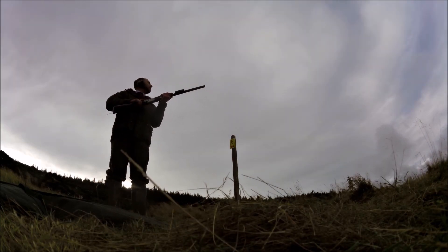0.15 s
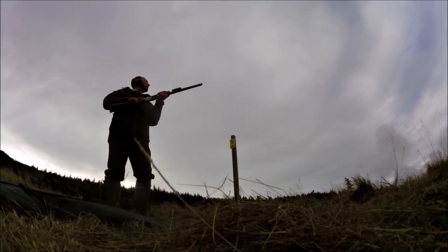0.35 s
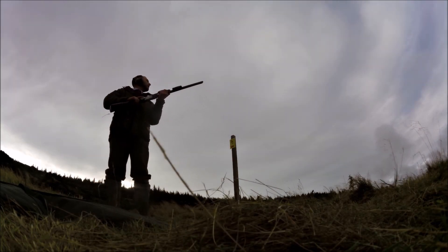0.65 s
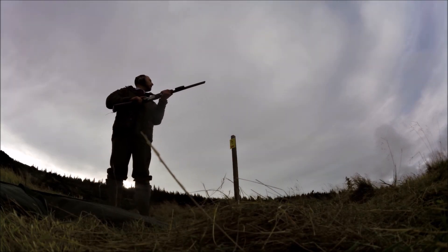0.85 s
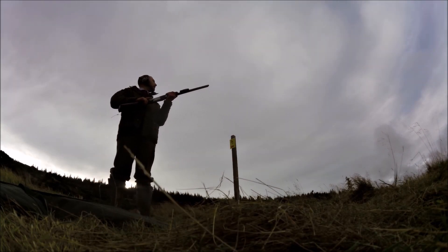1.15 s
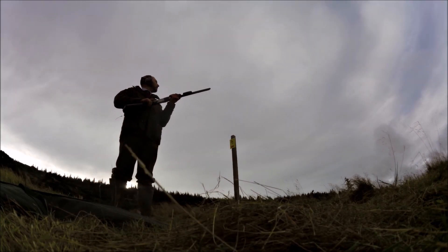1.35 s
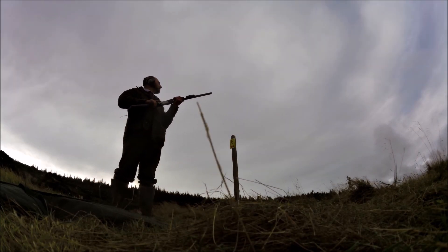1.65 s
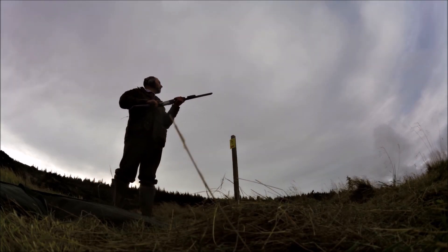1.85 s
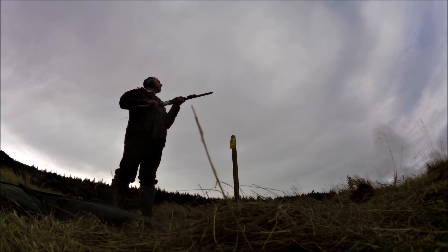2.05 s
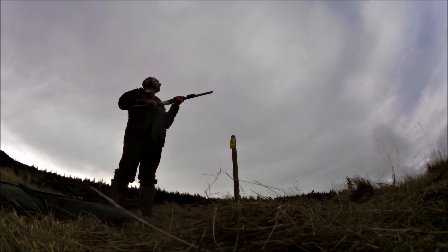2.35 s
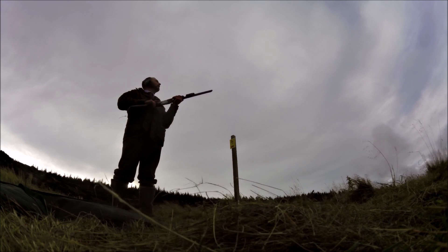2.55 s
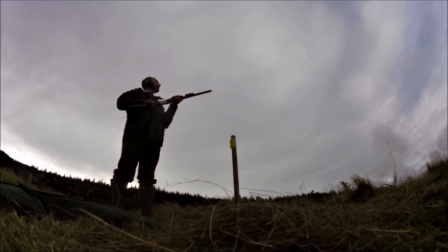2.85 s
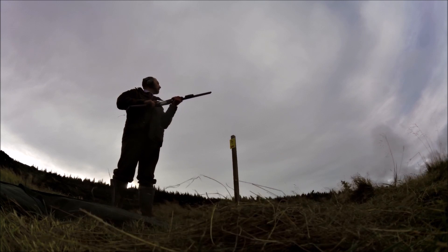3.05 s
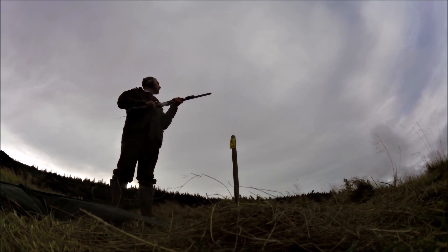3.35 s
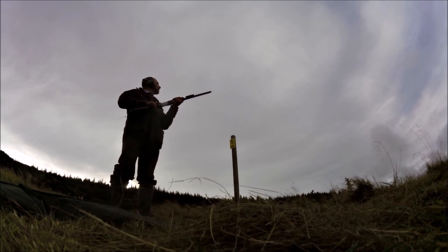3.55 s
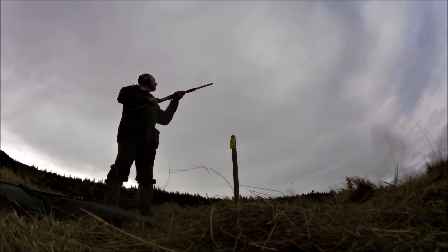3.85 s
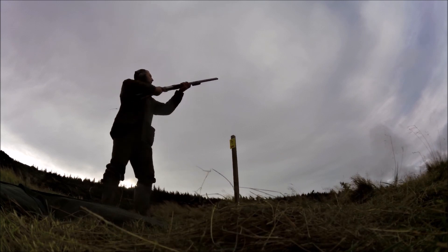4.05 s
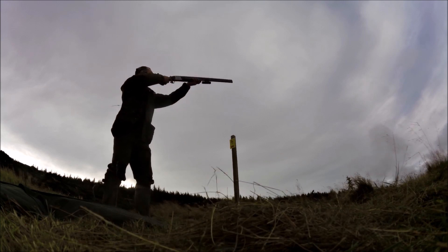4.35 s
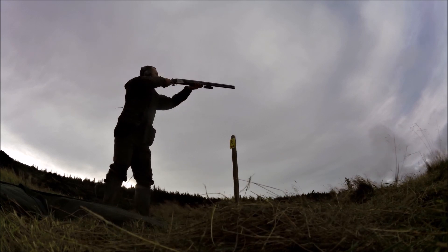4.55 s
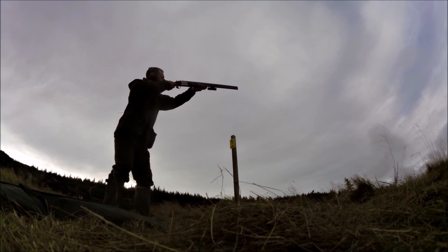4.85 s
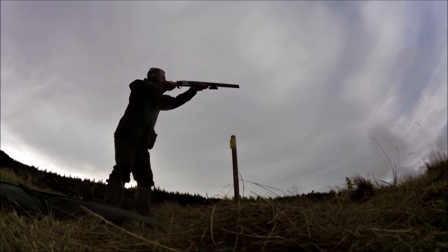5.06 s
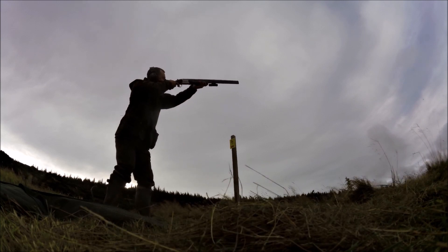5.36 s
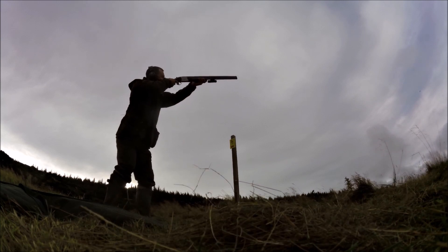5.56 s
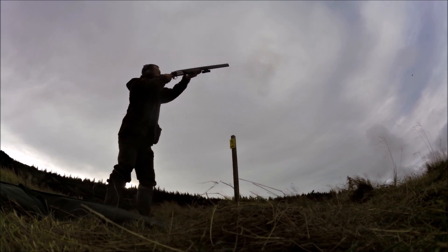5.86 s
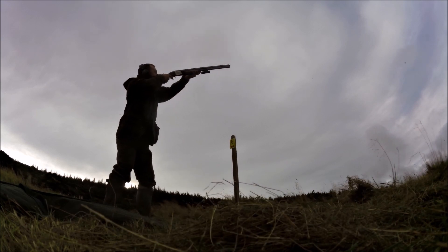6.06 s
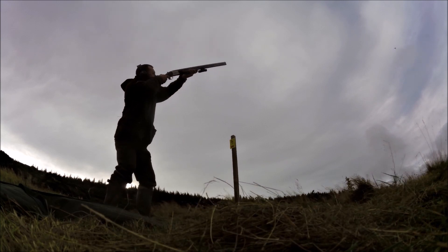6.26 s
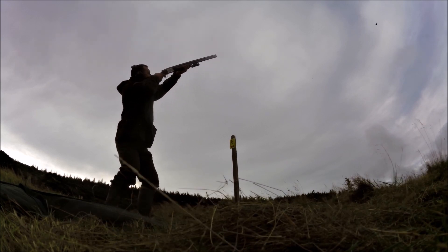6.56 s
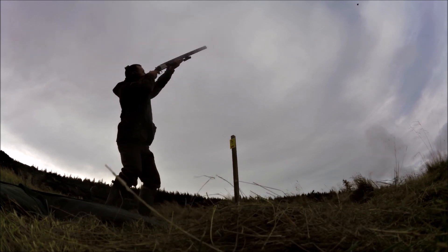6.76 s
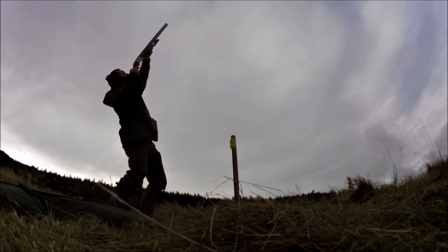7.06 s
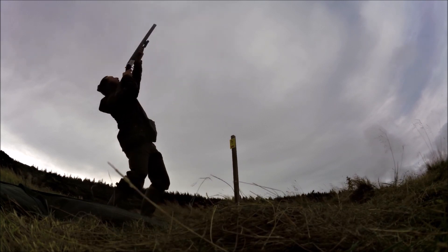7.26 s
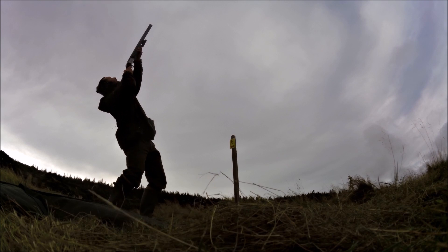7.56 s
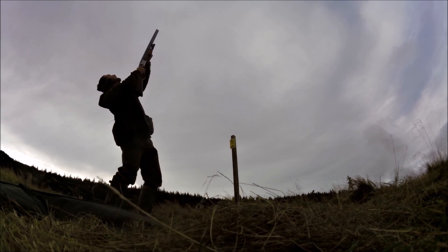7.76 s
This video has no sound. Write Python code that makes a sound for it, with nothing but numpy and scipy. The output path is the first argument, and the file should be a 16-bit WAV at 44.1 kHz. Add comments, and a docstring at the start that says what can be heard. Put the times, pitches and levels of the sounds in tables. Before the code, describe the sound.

On an open hillside, light wind bumps softly against a microphone low in the grass. Shotguns then start firing at a distance, an uneven string of pops and thuds, each followed by a short echo rolling off the slopes. Late on, a much closer gun fires two loud, sharp blasts about a second apart, while the distant guns keep going. Faint open air hiss lies underneath.

```python
"""Shotguns on an open hillside

A line of guns fires, heard by a small camera lying low in the grass. Each blast comes as two pressure
fronts, a bank bounce and a slow ground wave, scatters off the turf and rolls back from the slopes.
The nearest gun overloads the microphone; between shots light wind bumps against it."""
import sys
import numpy as np
from scipy import signal
from scipy.fft import rfft, irfft, next_fast_len
from scipy.io import wavfile

SR = 44100
rng = np.random.default_rng(int(sys.argv[2]) if len(sys.argv) > 2 else 0)


def to_wav(sig):
    """Store sig (one row per channel, or 1-D mono) as 16-bit WAV at the path in sys.argv[1].

    Samples outside -1..1 are clipped; the rate is SR.
    """
    pcm = np.clip(np.atleast_2d(sig), -1, 1) * 32767
    pcm = np.round(pcm).astype(np.int16)
    wavfile.write(sys.argv[1], SR, pcm.T)  # frames by channels


N = 348831
TIME = np.arange(N) / SR
CONTROL_TIME = TIME[::44]

# Camera case resonances: pitch_hz, width_hz, gain_db
CASE_MODES = [(455, 296, -0.5), (2260, 180, -10.5), (4240, 570, -10)]
# Gunshots: start_s, first_front_db, second_front_db, second_lag_ms, overpressure_ms, air_cutoff_hz,
# hollow_hz, hollow_db, bank_db, bank_lag_ms, wave_db, wave_lag_ms, wave_hz, tail_db
GUNSHOTS = [ (1.981, 0.5, 11, 1.93, 0.73, 1280, 1420, 11, -3, 14.4, -9.5, 7.2, 204, -36.5),
            (2.958, -3, 9.5, 1.9, 0.85, 1750, 2580, 9.5, -10.5, 14.6, -19.6, 10.8, 109, -41.5),
            (3.1896, -3.5, 4.5, 1.81, .42, 3500, 1770, 8, -13.5, 13.8, -20, 6.9, 135, -43.5),
            (4.2359, -2.5, 5, 1.97, 0.44, 2700, 2030, 7, -16, 15.5, -20, 7.3, 134, -48.5),
            (4.4563, 1, 1.5, 3.33, 1.36, 644, 2210, 14.5, -16, 15.1, -26, 12.5, 131, -44.5),
            (5.0452, -5.5, 5, 1.97, 1.2, 1510, 294, 6.5, -20, 8.3, -28, 12, 80, -49),
            (5.7233, -5.5, 1.1, 1.6, 0.31, 1550, 2650, 10.5, -18, 14, -24.5, 9.6, 119, -44.5),
            (5.908, -3.5, -4.5, 1.59, 0.9, 1690, 2170, 4, -24, 15, -33, 10.5, 105, -51),
            (5.933, 8, 25.5, 1.51, 0.39, 4100, 2500, 7, 18, 6.36, -1.5, 6.3, 140, -22.5),
            (6.1568, -3.5, 7, 0.89, 0.87, 1380, 2080, 9, -3, 4.4, -14, 6.76, 160, -52),
            (7.059, 11.5, 27, 1.14, 0.38, 3420, 2280, 4, 15, 7.9, -0.5, 5.28, 226, -25.5),
            (7.4062, -8.5, 2.5, 1.31, 0.47, 1880, 1850, 8, -28, 17, -18, 6.2, 154, -43.5)]


def blasts(direct_gain=0.13, bounce_cutoff_hz=1500, wave_width_cycles=0.66):
    """Three paths per shot, dulled by distance and coloured by the case, plus a low ground wave."""
    out = np.zeros(N)
    t_ms = TIME[:2048] * 1000
    for (start_s, first_db, second_db, second_lag_ms, overpressure_ms, air_cutoff_hz,
         hollow_hz, hollow_db, bank_db, bank_lag_ms, wave_db, wave_lag_ms, wave_hz, _) in GUNSHOTS:
        first = from_db(first_db) * pressure_front(t_ms, overpressure_ms)
        second = from_db(second_db) * pressure_front(t_ms - second_lag_ms, overpressure_ms)
        bank = from_db(bank_db) * pressure_front(t_ms - bank_lag_ms, overpressure_ms)
        pressure = cut(first + cut(second + bank, bounce_cutoff_hz, order=1), air_cutoff_hz)
        # the lie of the ground favours one band
        pressure += from_db(hollow_db) * resonate(pressure, hollow_hz, hollow_hz / 5)
        case = sum(from_db(db) * resonate(pressure, hz, width_hz) for hz, width_hz, db in CASE_MODES)
        cycles = (t_ms - wave_lag_ms) * wave_hz / 1000
        envelope = np.exp(-(cycles / wave_width_cycles) ** 2) * np.clip(2 * t_ms / wave_lag_ms, 0, 1)
        ground_wave = from_db(wave_db) * envelope * np.sin(2 * np.pi * cycles)
        at = round(start_s * SR)
        out[at:at + len(t_ms)] += ground_wave - (direct_gain * pressure + case)
    return cut(out, hz=6200, order=4)


def pressure_front(t_ms, overpressure_ms):
    """A pressure jump that falls through zero into a longer suction."""
    jump = np.clip(t_ms * SR / 1000, 0, 1)
    return jump * (1 - t_ms / overpressure_ms) * np.exp(-np.maximum(t_ms, 0) / overpressure_ms)


# Turf scatter spectrum: freq_hz, level_db
TURF_SPECTRUM = [(40, -27.5), (150, -17), (250, 3), (400, -6.5), (520, 3), (800, -8.5), (1200, -12.5),
                 (2300, -23.5), (4000, -35.5), (7000, -55.5), (14000, -89)]


def turf_scatter(gain_db=-26.5, cutoff_ratio=2.17):
    """Tussocks throw each blast back within milliseconds; duller shots scatter duller."""
    out = np.zeros(N)
    tussocks = noise(TURF_SPECTRUM)
    for start_s, _, second_db, _, _, air_cutoff_hz, *_ in GUNSHOTS:
        t, span = shot_window(start_s)
        envelope = from_db(second_db + gain_db) * fading(t, fall_s=0.0089, rise_s=0.0019)
        out[span] += envelope * cut(tussocks[span], cutoff_ratio * air_cutoff_hz)
    return out


# Tail rumble, middle and hiss: t60_s, level_db, spectrum (freq_hz, level_db)
TAIL_BANDS = [(0.71, -4, [(40, -13), (110, 3), (250, 4), (430, -6.5), (600, -33), (1500, -52)]),
              (0.19, 4.5, [(250, -6), (450, -2.5), (680, -6.5), (900, -19), (1300, -25.5), (3000, -41)]),
              (0.35, -18, [(700, -24.5), (1200, 5), (2600, 8), (4000, -6), (5800, -14.5), (7500, -34),
              (12000, -64)])]


def ground_tail():
    """Ground further out adds a short tail, each band dying at its own pace."""
    out = np.zeros(N)
    for t60_s, band_db, spectrum in TAIL_BANDS:
        band = noise(spectrum)
        fall_s = t60_s / np.log(1000)
        for start_s, *_, tail_db in GUNSHOTS:
            t, span = shot_window(start_s)
            out[span] += from_db(tail_db + band_db) * fading(t, fall_s, rise_s=0.0025) * band[span]
    return cut(out, hz=5900, order=6)  # grass swallows the highest treble


def sinking_tail(start_hz=680.5, end_hz=169.9, glide_s=0.075, half_width_hz=76, gain_db=-1.5):
    """A hollow band in each tail sinks in pitch as reflections come from further out."""
    out = np.zeros(N)
    grain = rms_one(cut(rng.standard_normal((2, N)), half_width_hz))
    for start_s, *_, tail_db in GUNSHOTS:
        t, span = shot_window(start_s)
        pitch_hz = end_hz + (start_hz - end_hz) * np.exp(-t / glide_s)
        phase = 2 * np.pi * np.cumsum(pitch_hz) / SR
        band = grain[0, span] * np.cos(phase) + grain[1, span] * np.sin(phase)
        out[span] += from_db(tail_db + gain_db) * fading(t, fall_s=0.065, rise_s=0.005) * band
    return out


# Slope reflection spectrum: freq_hz, level_db
SLOPE_SPECTRUM = [(40, -19.5), (120, -8.5), (200, -1), (350, 3.5), (550, 0), (800, -5.5), (1080, -14),
                  (1400, -12), (1950, -19), (2600, -25.5), (3300, -40), (4200, -44), (6000, -64),
                  (9000, -69.5)]
# Rolls off the slopes: start_s, level_db, treble_offset_db, swell_s, hold_s, fall_db_per_s, hollow_hz
SLOPE_ROLLS = [(2.06, -58.5, 0, .04, 0.1, 56.5, 590), (2.183, -46, -16, .03, 0.067, 19.5, 580),
               (3.318, -44.5, -13.5, 0.089, 0.067, 29, 334), (3.868, -46, -13, 0.075, 0.17, 19.5, 455),
               (4.768, -42, -14.5, 0.0083, 0.19, 30.5, 320), (4.948, -47, -11.5, 0.035, 0.35, 16, 360),
               (6.098, -37, -11.5, .16, 0.21, 49, 472), (6.83, -49.5, -10.5, 0.049, 0.26, 24, 500),
               (7.589, -38.5, -10, 0.017, 0.11, 48.5, 475)]


def hillside_rolls(split_hz=1000, hollow_mix=0.78, treble_hold_ratio=0.23, treble_fall_ratio=0.68):
    """Countless reflections from each slope merge into a roll with its own hollow pitch."""
    reflections, hollow_noise = noise(SLOPE_SPECTRUM), noise(SLOPE_SPECTRUM)
    body_power, treble_power, hollow = 0, 0, 0
    for start_s, level_db, treble_offset_db, swell_s, hold_s, fall_db_per_s, hollow_hz in SLOPE_ROLLS:
        t = CONTROL_TIME - start_s
        level = from_db(level_db) * rolling(t, swell_s, hold_s, fall_db_per_s)
        body_power += level ** 2
        treble_shape = rolling(t, swell_s, hold_s * treble_hold_ratio, fall_db_per_s * treble_fall_ratio)
        treble_power += (from_db(level_db + treble_offset_db) * treble_shape) ** 2
        hollow += to_audio_rate(level) * rms_one(resonate(hollow_noise, hollow_hz, width_hz=150))
    body = to_audio_rate(np.sqrt(body_power)) * rms_one(cut(reflections, split_hz, order=4))
    body = (body + hollow_mix * hollow) / np.hypot(1, hollow_mix)
    hiss = cut(reflections, split_hz, "high", order=4)
    ring = 0.6 * resonate(hiss, hz=2584, width_hz=200)
    treble = to_audio_rate(np.sqrt(treble_power)) * rms_one(hiss + ring)
    return (body + treble) * flutter(rate_hz=64, depth_db=1.07)


# Echoes off banks and tree lines: start_s, level_db, fall_s, cutoff_hz
BANK_ECHOES = [(2.062, -28, 0.0073, 4020), (2.117, -36, 0.038, 7000), (2.198, -44, 0.18, 6030),
               (3.163, -36.5, 0.0045, 1200), (3.289, -40.5, 0.023, 4000), (4.336, -37, 0.0052, 2500),
               (4.633, -36, 0.022, 2490), (4.672, -38, 0.019, 2480), (4.781, -35.5, .011, 2000),
               (6.047, -35, 0.12, 3400), (7.233, -27.5, 0.0035, 2500), (7.475, -31.5, 0.0071, 3000),
               (7.531, -32.5, 0.036, 5000)]


def echoes(rise_s=0.0024):
    """A few steep faces answer distinctly, each with its own brightness."""
    spectrum = [(100, -5.5), (300, 9.5), (600, 7), (1100, -8),
                (2500, -16), (4200, -32), (6000, -44), (9000, -77)]
    reflections = cut(noise(spectrum), 170, "high")
    out = np.zeros(N)
    for start_s, level_db, fall_s, cutoff_hz in BANK_ECHOES:
        envelope = from_db(level_db) * fading(CONTROL_TIME - start_s, fall_s, rise_s)
        out += to_audio_rate(envelope) * cut(reflections, cutoff_hz)
    return out


# Tick spectrum: freq_hz, level_db
TICK_SPECTRUM = [(500, -4), (2500, 3), (4800, -6), (6500, -17), (10000, -36)]
# Dry ticks: start_s, level_db, fall_s
DRY_TICKS = [(7.256, -55, 0.0089), (7.269, -58, .002)]


def ticks():
    """Tiny bright clicks after the last close shot."""
    envelope = sum(from_db(level_db) * fading(TIME - start_s, fall_s, rise_s=0.0005)
                   for start_s, level_db, fall_s in DRY_TICKS)
    return envelope * noise(TICK_SPECTRUM)


# Buffeting spectrum: freq_hz, level_db
WIND_SPECTRUM = [(30, -32), (60, 0), (110, 2), (170, 2.5), (290, -2), (450, -17), (650, -28), (1200, -61),
                 (5000, -98)]
# Wind bumps: peak_s, level_db, width_s
WIND_BUMPS = [(.11, -58.5, 0.065), (.252, -40.5, 0.012), (.303, -40, 0.019), (.445, -54, 0.079),
              (.552, -46, .019), (1.0, -50, 0.022), (1.075, -55.5, 0.055), (2.46, -46, 0.055),
              (2.72, -49.5, 0.084), (3.7, -57.5, 0.21), (5.62, -52, 0.084), (5.82, -45.5, .083),
              (6.48, -41, 0.038)]


def wind():
    """Gusts buffet the microphone in low, lumpy, bell-shaped bursts."""
    power = 0
    for peak_s, level_db, width_s in WIND_BUMPS:
        offset = np.clip((CONTROL_TIME - peak_s) / width_s, -30, 30)
        power += 2 * from_db(level_db) ** 2 / np.cosh(offset) ** 4
    return to_audio_rate(np.sqrt(power)) * noise(WIND_SPECTRUM) * flutter(rate_hz=60, depth_db=4.0)


# Open air spectrum: freq_hz, level_db
AIR_SPECTRUM = [(12, -46), (20, -20.5), (65, 11.5), (134, 4), (485, 0), (558, -2), (642, -4), (738, -4.5),
                (1060, -6), (1810, -9.5), (2020, -8.5), (2320, -11), (2670, -11), (4540, -19),
                (16000, -36.5)]


def open_air(level_db=-61.5):
    """A faint, even hiss of open air."""
    return from_db(level_db) * noise(AIR_SPECTRUM)


def from_db(db):
    """Decibels to gain."""
    return 10 ** (np.asarray(db) / 20)


def rms_one(x):
    """Scale to unit rms."""
    return x / np.sqrt(np.mean(x ** 2) + 1e-20)


def cut(x, hz, kind="low", order=2):
    """Butterworth low- or high-pass."""
    sections = signal.butter(order, np.clip(hz, 10, SR / 2.2), kind, fs=SR, output="sos")
    return signal.sosfilt(sections, x)


def resonate(x, hz, width_hz):
    """Resonator with unit peak gain."""
    radius = np.exp(-np.pi * width_hz / SR)
    feedback = [1, -2 * radius * np.cos(2 * np.pi * hz / SR), radius ** 2]
    return signal.lfilter((1 - radius ** 2) / 2 * np.array([1, 0, -1]), feedback, x)


def noise(spectrum):
    """Unit-rms noise shaped by rows of freq_hz, level_db."""
    size = next_fast_len(N)
    freq_hz, level_db = np.transpose(spectrum)
    bins_hz = np.fft.rfftfreq(size, 1 / SR)
    gain = from_db(np.interp(np.log(bins_hz + 1), np.log(freq_hz), level_db))
    return rms_one(irfft(rfft(rng.standard_normal(size)) * gain, size)[:N])


def flutter(rate_hz, depth_db):
    """Randomly wandering gain."""
    points = rng.standard_normal(4096)
    return from_db(depth_db * np.interp(TIME * rate_hz, np.arange(len(points)), points))


def fading(t, fall_s, rise_s):
    """Quick rise at t = 0, exponential fall."""
    t = np.maximum(t, 0)
    return (1 - np.exp(-t / rise_s)) * np.exp(-np.minimum(t / fall_s, 30))


def rolling(t, swell_s, hold_s, fall_db_per_s):
    """Swell, hold, then a steady fall in decibels."""
    return np.clip(t / swell_s, 0, 1) * from_db(-fall_db_per_s * np.maximum(t - swell_s - hold_s, 0))


def to_audio_rate(control):
    """Interpolate a slow control to every sample."""
    return np.interp(TIME, CONTROL_TIME, control)


def shot_window(start_s):
    """Local time and sample span for up to half a second after a shot."""
    at = round(start_s * SR)
    t = TIME[:min(N - at, SR // 2)]
    return t, slice(at, at + len(t))


def scene():
    """Guns, their echoes and the wind at one microphone."""
    guns = blasts() + turf_scatter() + ground_tail() + sinking_tail()
    mix = guns + hillside_rolls() + echoes() + ticks() + cut(wind() + open_air(), 38, "high")
    return mix[None, :]


def record(dry, clip_level=0.75, low_cut_hz=25, rolloff_hz=7000, band_limit_hz=16000):
    """The microphone loses the lowest bass, flattens the loudest fronts and rounds off the treble."""
    pressure = cut(dry, low_cut_hz, "high", order=1)
    clipped = pressure / (1 + (pressure / clip_level) ** 16) ** (1 / 16)
    dipped = clipped - 0.38 * resonate(clipped, hz=8300, width_hz=2500)
    softened = cut(dipped, rolloff_hz, order=1)
    band_limit = signal.ellip(10, 0.1, 80, band_limit_hz, fs=SR, output="sos")
    return signal.sosfilt(band_limit, softened)


dry = scene()
out = record(dry)
to_wav(out)
```